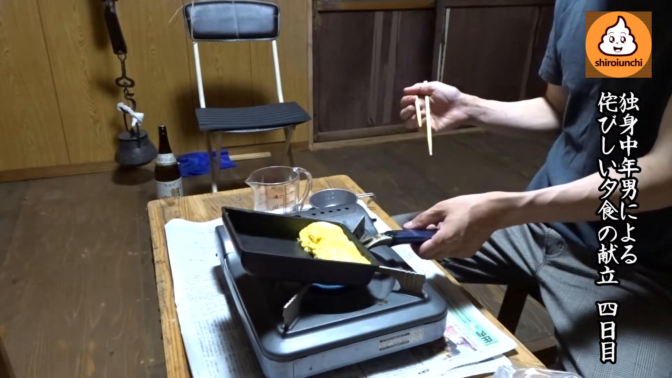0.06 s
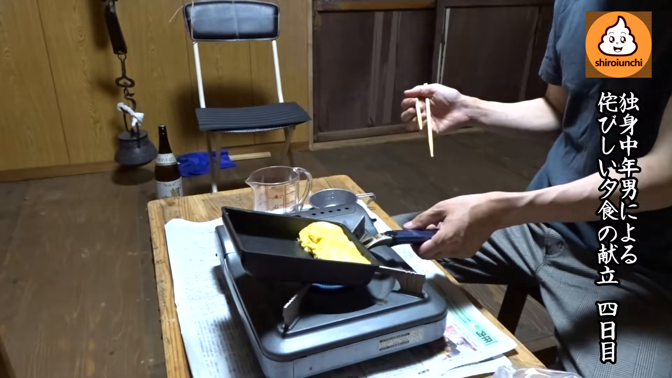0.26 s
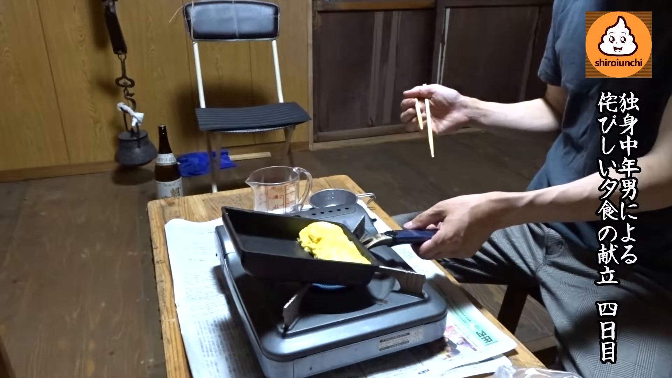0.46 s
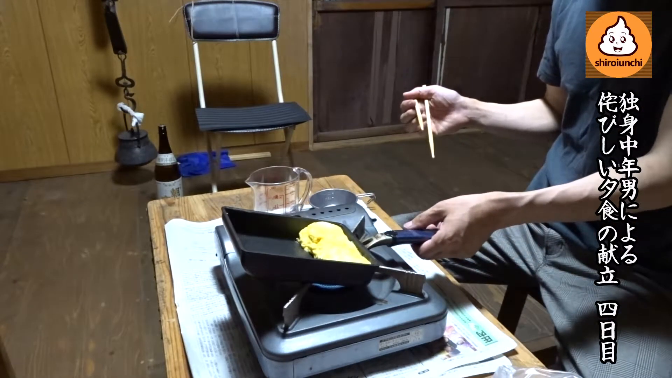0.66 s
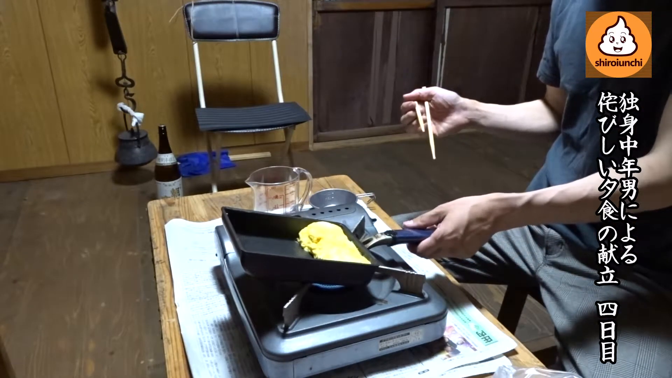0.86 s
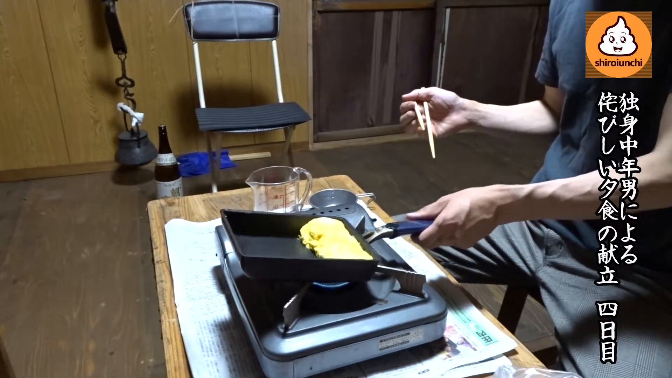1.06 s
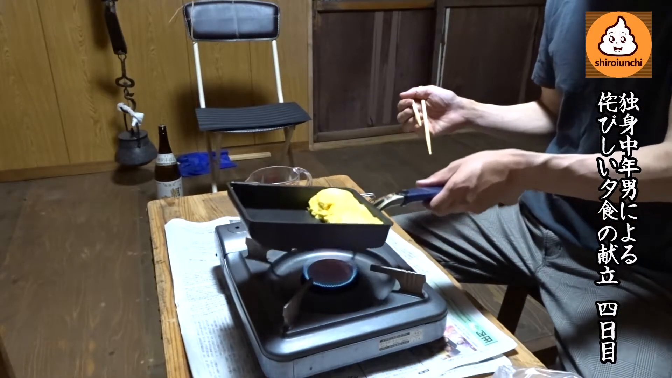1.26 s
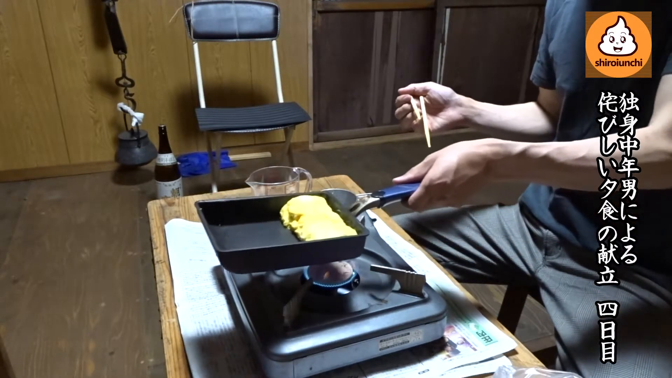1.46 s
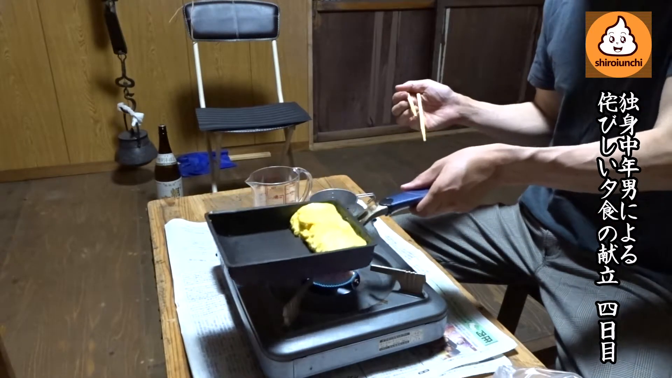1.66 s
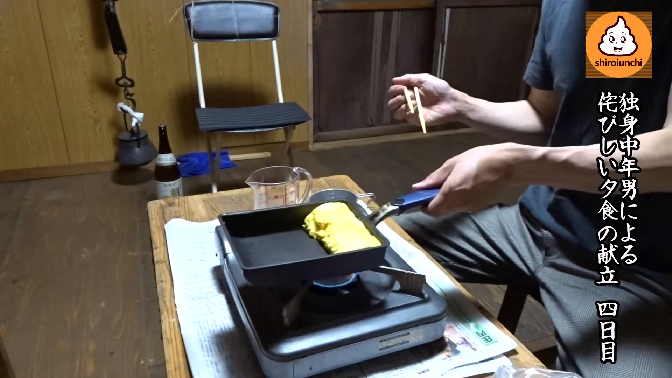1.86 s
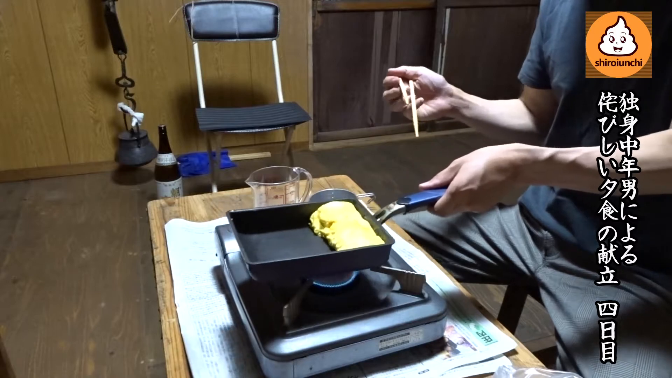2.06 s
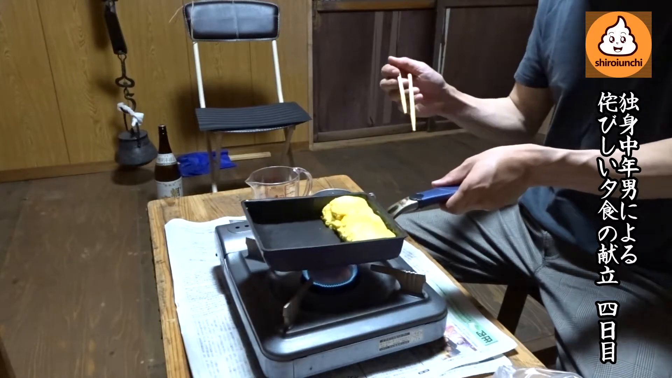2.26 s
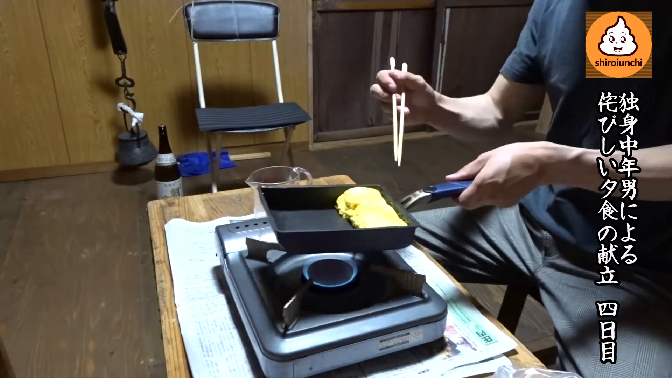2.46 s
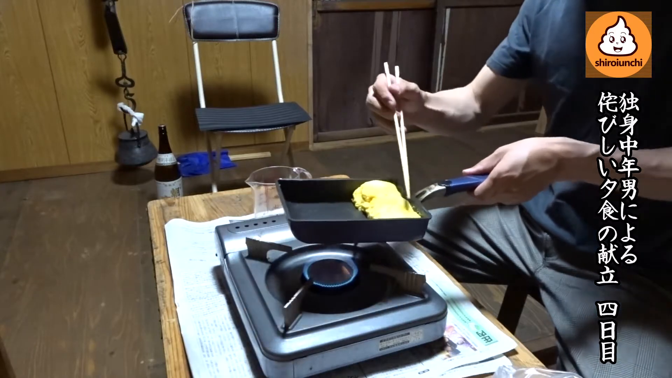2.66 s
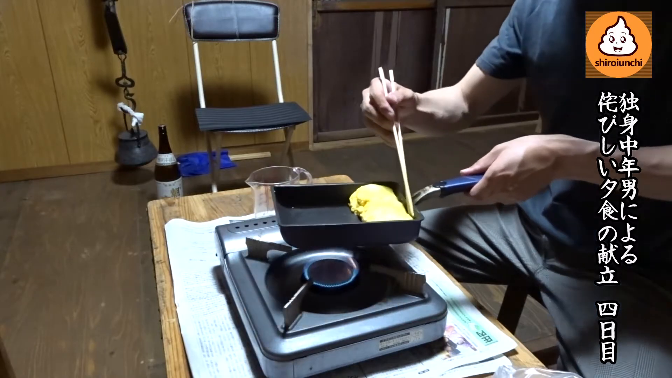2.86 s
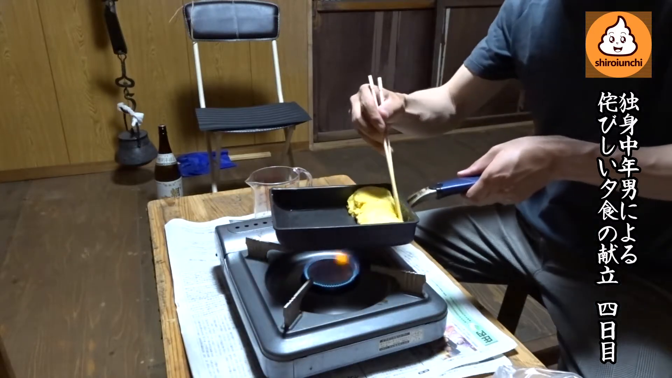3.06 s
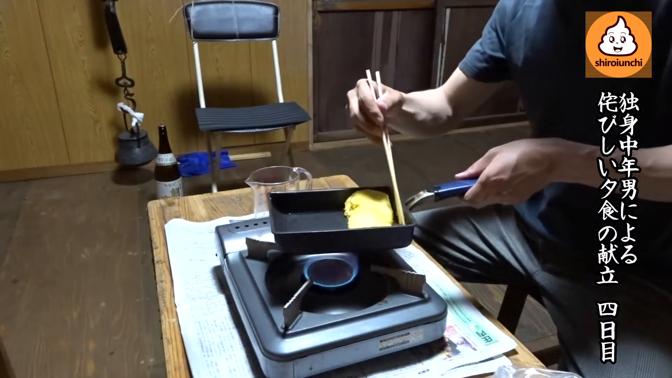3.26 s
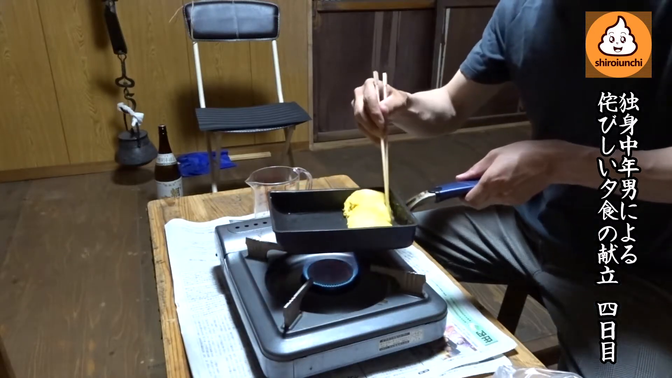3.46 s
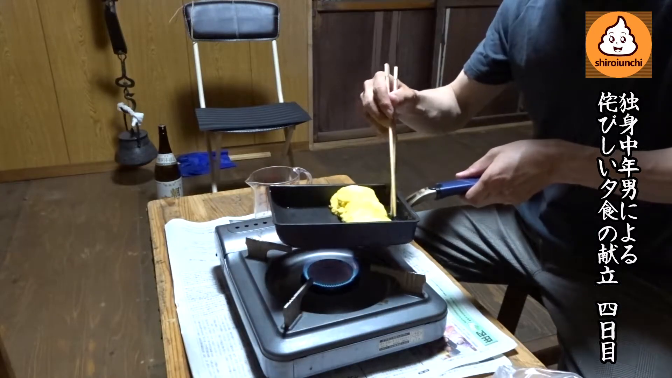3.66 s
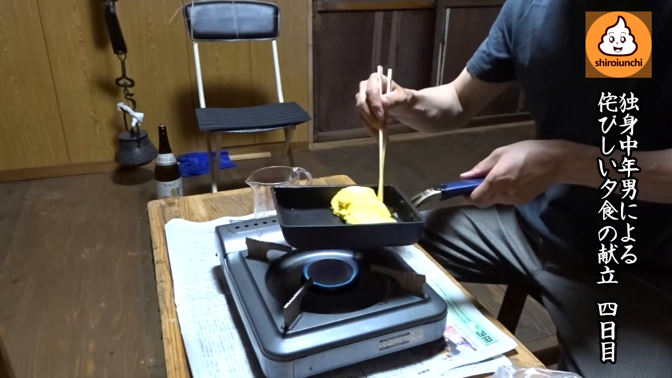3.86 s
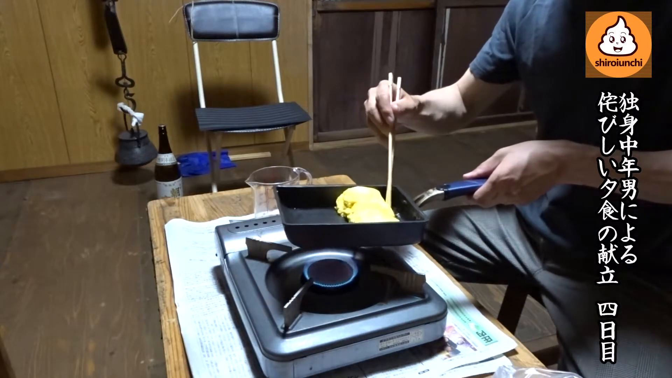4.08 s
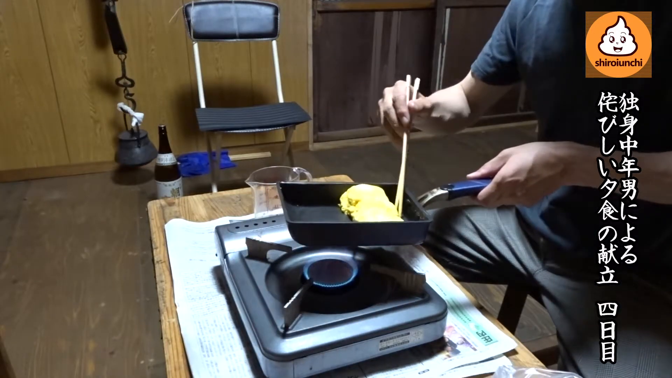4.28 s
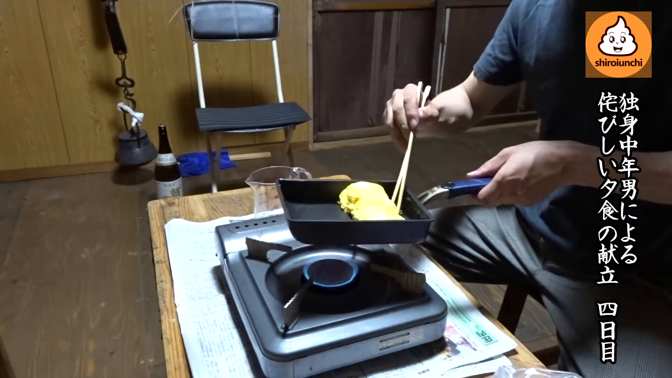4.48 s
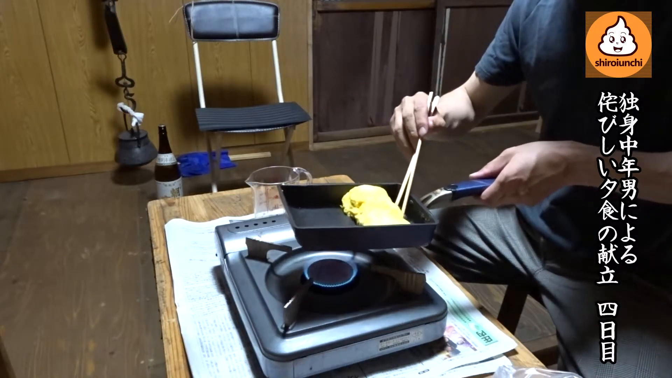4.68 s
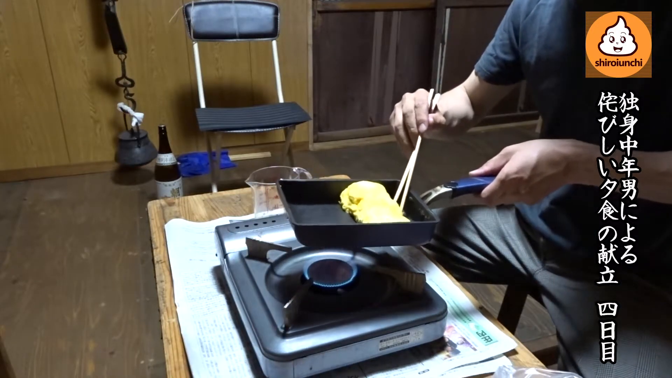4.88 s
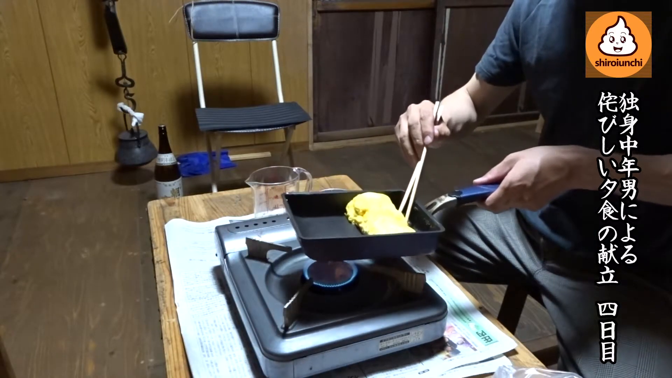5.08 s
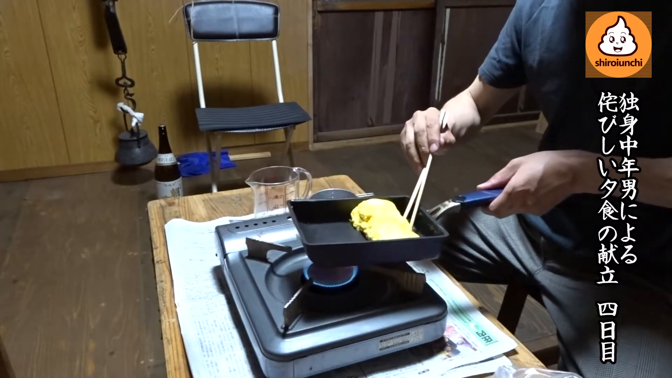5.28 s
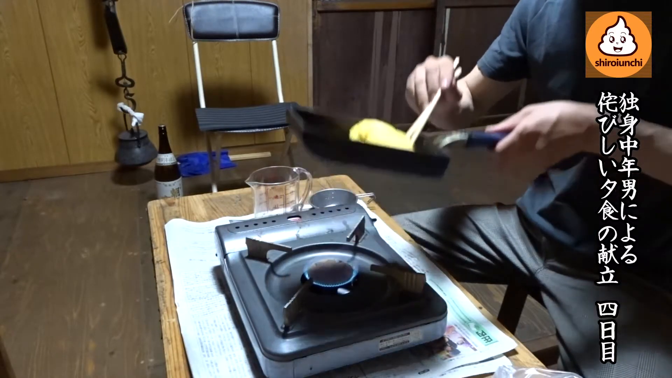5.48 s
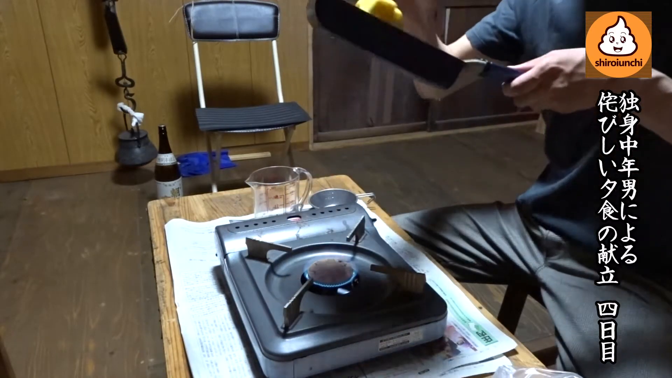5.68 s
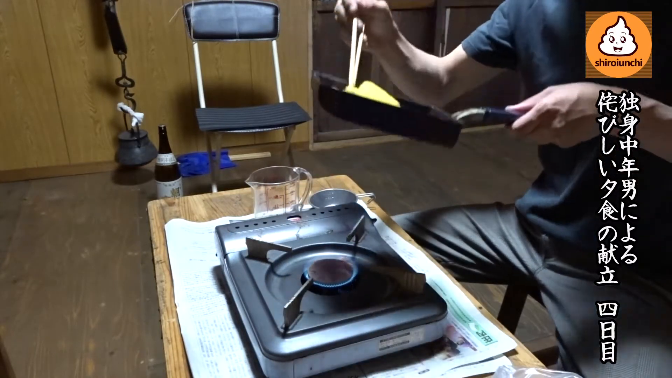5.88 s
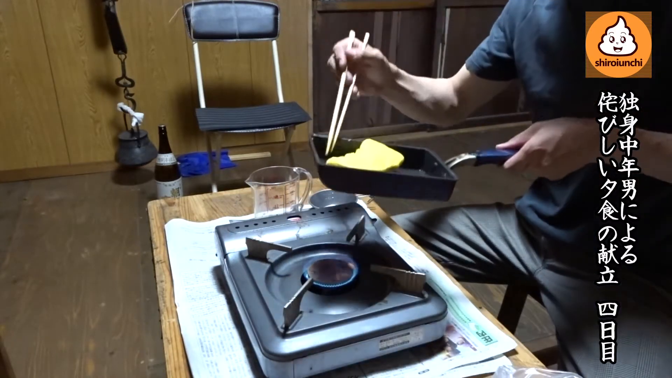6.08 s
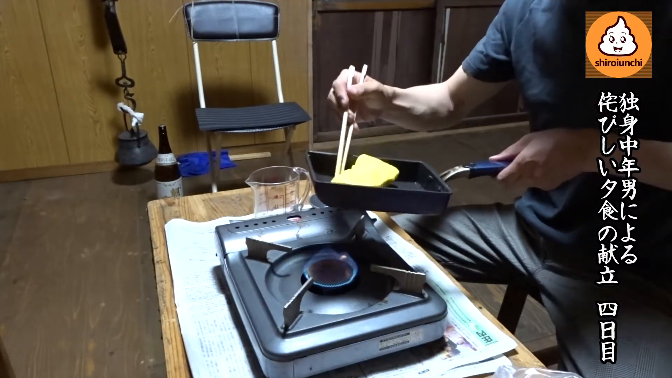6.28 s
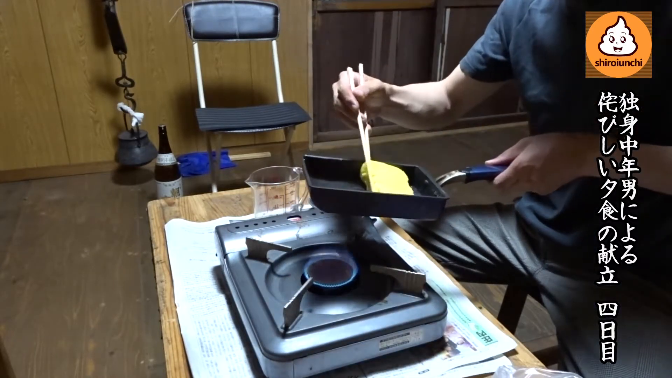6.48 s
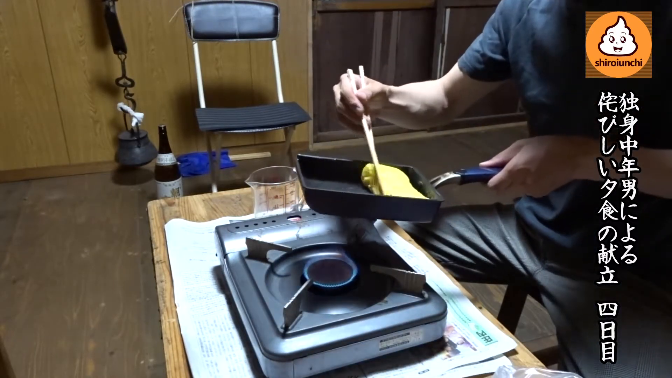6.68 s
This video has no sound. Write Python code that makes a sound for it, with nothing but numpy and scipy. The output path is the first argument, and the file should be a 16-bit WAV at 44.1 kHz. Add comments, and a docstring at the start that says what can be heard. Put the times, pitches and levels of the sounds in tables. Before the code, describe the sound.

Close stereo pickup in a small wooden room. An egg roll crackles in a square metal pan, with sharp oil spits over a faint low gas rush. At about one second the pan knocks and scrapes off the stove prongs with a hollow, groaning metallic boom. Frying surges unevenly and chopsticks tick lightly. Near the end the egg is flipped and its wet side erupts into loud, dense hissing that slowly fades.

```python
"""An egg roll sizzles in a square pan over a gas burner in a small wooden room: bursting steam bubbles.
Hot oil spits as short damped tones, and the burner rushes softly as coloured noise.
The pan is dragged off the stove's prongs: knocks and stick-slip friction excite sheet-metal modes.
Chopsticks tap as struck resonators; the egg is flipped, and its wet side bursts into a dense hiss."""
import sys
import numpy as np
from scipy import signal
from scipy.fft import rfft, irfft, next_fast_len
from scipy.io import wavfile

SR = 44100
rng = np.random.default_rng(int(sys.argv[2]) if len(sys.argv) > 2 else 0)


def pcm_store(signal):
    """Save signal as 16-bit PCM."""
    levels = np.round(np.clip(np.atleast_2d(signal), -1, 1) * 32767)
    wavfile.write(sys.argv[1], SR, levels.astype(np.int16).T)


N = 296793
TIME = np.arange(N) / SR  # [s]
FFT_SIZE = next_fast_len(N + 4096)
HZ = np.fft.rfftfreq(FFT_SIZE, 1 / SR)  # frequency grid of the filters

# spectrum of the first side: (frequency [Hz], level per hertz [dB])
FIRST_COLOUR = [(450, -7.5), (900, -5.5), (1200, -1.5), (1700, -2), (2200, -0.5), (2700, 0.5), (3900, -0.5),
                (5000, -3.5), (7200, -4), (8600, -2), (10000, -4), (11500, -8), (14900, -8.5), (15500, -41)]
# spectrum of the wet side: (frequency [Hz], level per hertz [dB])
WET_COLOUR = [(400, -25), (700, -21.5), (1000, -14), (1300, -12), (1800, -7), (2200, -2.5), (3200, -2),
              (4500, -3), (6200, -4), (8000, -6.5), (10000, -8.5), (12000, -10), (15700, -12.5)]
# bubble sizes on the wet side, large to tiny: (level [dB], fade as it dries [dB/s])
WET_SIZES = [(-47.5, 6), (-38, 8), (-34.5, 18.5)]
# bubble sizes on the first side, at mean vigour [dB]
SIMMER_DB, CRACKLE_DB, HISS_DB = -57, -48.5, -48.0
# the wet side lands, then hisses at full strength [s]
FLIP_S, FLIP_LENGTH_S, WET_HOLD_S = 5.73, 0.063, 0.72


def egg():
    """Superposed random bursts: the first side crackles sparsely, the wet side hisses densely, holds and fades."""
    mids_db, treble_db = vigour_swing()
    first_levels = [SIMMER_DB + mids_db, CRACKLE_DB + mids_db, HISS_DB + treble_db]
    first = sizzle(first_levels, FIRST_COLOUR, per_s=6000, spread_db=[2.4, 3.0, 3.2], ring_db=-2)
    drying_s = np.maximum(TIME - FLIP_S - WET_HOLD_S, 0)
    wet_levels = [db - fade * drying_s for db, fade in WET_SIZES]
    wet = sizzle(wet_levels, WET_COLOUR, per_s=14000, spread_db=[2.6, 3.0, 3.0], ring_db=4.5)
    wet_share = flipped()
    first_share = np.sqrt(1 - wet_share ** 2)  # the two powers add to one
    return first * first_share + wet * wet_share + puffs()


# frying on the first side, surging as the pan tilts and oil runs onto hot metal; only swings about the mean count:
# (time [s], level of the mids [dB], level of the treble [dB])
VIGOUR = [(0, -49, -47.5), (0.2, -52.5, -51), (0.95, -52.5, -51), (1.46, -50, -50), (1.52, -42, -44.5),
          (1.73, -49.5, -48), (1.78, -44, -42.5), (1.94, -44, -46), (2.09, -43, -47.5),
          (2.17, -46.5, -47.5), (2.24, -46.5, -46), (2.45, -50, -50.5), (3.06, -50, -50.5),
          (3.12, -47, -48), (3.38, -46.5, -48), (3.49, -43.5, -45), (3.6, -43.5, -43), (3.74, -47.5, -50),
          (3.85, -45, -47.0), (4.1, -47.5, -51), (4.65, -48.5, -51), (4.8, -49, -49.5), (5.38, -50, -50.5),
          (5.45, -46, -44.5), (5.6, -43.5, -42.5), (5.72, -44.5, -43.5)]


def vigour_swing():
    """Modulation about a mean: the vigour of the frying in dB, for mids and treble."""
    return [db - db[TIME < FLIP_S].mean() for db in in_time(VIGOUR)]


# the roll tips onto its edge just before it lands: length [s], share of the wet side that touches
TIP_LENGTH_S, TIP_SHARE = 0.51, 0.26


def flipped():
    """Growing contact area: an edge of the wet side touches as the roll tips, then all of it lands."""
    tipping = np.clip((TIME - FLIP_S) / TIP_LENGTH_S + 1, 0, 1)
    landing = np.clip((TIME - FLIP_S) / FLIP_LENGTH_S, 0, 1)
    return np.maximum(TIP_SHARE * tipping, landing)


# share of the sizzle's power that arrives directly: (frequency [Hz], share [0-1])
DIRECT = [(500, 0.62), (1200, 0.66), (2200, 0.95), (3300, 0.91), (5300, 0.24), (9000, 0.27), (15000, 0.13)]


def sizzle(levels_db, colour, per_s, spread_db, ring_db):
    """Bubble collapse in three sizes: large ones simmer, middle ones crackle, tiny ones hiss."""
    direct = at_hz(DIRECT, HZ)
    tone = from_db(at_hz(colour, HZ)) * through_pan(ring_db)
    edges = [350, 1600, 4500, SR]  # [Hz]
    out = 0
    for low, high, db, spread in zip(edges, edges[1:], levels_db, spread_db):
        bursts = grains(per_s, spread, clump_db=1.23)
        band = tone / np.sqrt((1 + (HZ / high) ** 12) * (1 + (low / (HZ + 1)) ** 12))
        heard = filtered(bursts, band * np.sqrt(direct))
        heard = heard + filtered(wash(bursts), band * np.sqrt(1 - direct))
        out = out + from_db(db) * rms_one(heard)
    return out


# modes of the pan: (frequency [Hz], width [Hz], level over the sizzle before ring_db [dB])
PAN = [(799.6, 8.1, 6), (1182, 8.2, 3), (1425, 26, -4.5), (1730, 35, -9.5), (2133, 24, 0.5),
       (2646, 20, -1.5), (3206, 20, -5.5), (4020, 22, -2)]


def through_pan(ring_db):
    """Modal resonance: the pan rings along with whatever bursts on it."""
    return 1 + sum(from_db(db + ring_db) * resonance(hz, width) for hz, width, db in PAN)


def wash(bursts, t60=0.28, near_share=0.17):
    """Diffuse reflection: noise follows the energy of bursts all over the pan, off the rim, then off the walls."""
    def fading(seconds):
        r = from_db(-120 / (seconds * SR))  # energy, so 60 dB doubles
        return signal.lfilter([1 - r], [1, -r], bursts ** 2 + 1e-18)
    energy = near_share * fading(0.0006) + (1 - near_share) * fading(t60)
    return np.sqrt(energy) * rng.standard_normal((2, N))


# steam squeezed from under the egg, through two equal resonances:
# (middle [s], length [s], frequency [Hz], width of each resonance [Hz], level at the middle [dB])
PUFFS = [(4.122, .14, 5561, 60, -55), (4.4, 3.6, 2600, 660, -53.5), (5.818, 0.062, 3650, 1404, -37),
         (5.955, .08, 3030, 260, -40), (6.09, 0.26, 3240, 260, -42), (6.213, 0.045, 1320, 280, -40),
         (6.27, 0.25, 3280, 260, -44), (6.33, 0.1, 1390, 200, -45.5)]


def puffs():
    """Turbulent jets through a resonance: pockets of steam under the egg sing as they vent."""
    out, turbulence = np.zeros(N), rng.standard_normal(N)
    for middle, length, hz, width, db in PUFFS:
        jet = rms_one(filtered(turbulence, resonance(hz, width) ** 2))
        swell = np.cos(np.pi * np.clip((TIME - middle) / length, -.5, .5))
        out += from_db(db) * jet * swell
    return out + from_db(-8.0) * room(out)


# the loudest spits of hot oil, before the room is added; the rows at 0.2777, 2.1087, 3.4092 and 3.7888 s are
# the sharp clicks of chopstick taps: # (time [s], peak level [dB], frequency [Hz], t60 [s], share of broad
# crack [0-1])
POPS = [(0.2777, -27, 3700, 0.009, .55), (0.2808, -27, 8800, 0.0077, .2), (0.4588, -24.5, 3700, 0.006, .5),
        (0.4732, -26, 8300, 0.005, .3), (0.5886, -27, 6300, 0.004, 0), (0.6403, -22, 3500, 0.009, .2),
        (1.4938, -17.5, 8000, 0.003, .7), (1.5964, -17.5, 9300, 0.008, .5), (1.6845, -28, 8500, .008, 0),
        (1.7665, -23, 8000, 0.0063, .3), (1.7815, -23.5, 6000, .003, .6), (1.8758, -16, 9300, 0.012, .45),
        (1.999, -26, 3200, 0.0095, 0), (2.1087, -22.5, 1950, 0.008, .5), (2.2236, -22, 6000, 0.004, .65),
        (2.3005, -26, 7000, .003, .5), (3.1025, -28, 3150, 0.008, .3), (3.4092, -26, 5200, 0.005, .65),
        (3.468, -27, 2500, 0.008, .2), (3.504, -25, 7000, .006, .5), (3.5839, -22, 3100, 0.0057, 0),
        (3.5896, -20, 6800, 0.012, 0), (3.5905, -19, 8800, 0.013, .1), (3.599, -20.5, 8000, 0.0065, 0),
        (3.6039, -18, 9200, 0.0083, .2), (3.7888, -24.5, 3100, 0.012, .2), (3.825, -29, 8000, .005, .3),
        (3.9503, -28.5, 4200, .004, .4), (3.964, -25.5, 2700, 0.006, .3), (4.0136, -26, 2900, 0.008, .3),
        (4.194, -23, 2850, 0.012, .1), (4.701, -29, 7000, .003, .4), (4.934, -25.5, 6100, 0.0083, .5),
        (4.9479, -24, 9500, 0.0055, .1), (5.1423, -27, 3000, 0.008, .2), (5.2122, -30, 9000, 0.006, 0),
        (5.324, -28, 8000, 0.003, .5), (5.3503, -27, 8400, 0.007, 0), (5.4368, -25.5, 3000, 0.007, .55),
        (5.6534, -22.5, 2600, 0.0064, .5)]
# spectrum of a spit's broad crack: (frequency [Hz], level per hertz [dB])
CRACK = [(2300, -10), (2800, 3), (4000, -10), (6000, -10), (9300, -2.5), (12000, -16), (16000, -14.5)]
SNAP_HZ = 3300  # pitch at which a pop's snap has weight snap_share; the weight grows as the square of pitch


def pops(snap_share=0.25, tone_share=0.9, rim_db=-10, room_db=-4):
    """Impulsive radiation: a sharp snap, a broad crack and damped ringing, scattered by the pan's rim and the room."""
    out, t = np.zeros(N), TIME[:1024]
    crack = coloured(signal.unit_impulse(N), CRACK)[:len(t)]
    for s, db, hz, t60, broad in [*POPS, *small_spits()]:
        snap = np.cos(2 * np.pi * hz * t) * from_db(-60 * t / .0005)
        partials = hz * np.exp(rng.normal(0, .04, (3, 1))) * [[.7], [1], [1.28]]
        tone = np.array([.25, .6, .25]) @ np.cos(2 * np.pi * partials * t) * from_db(-60 * t / t60)
        # a small source radiates little far from its own pitch
        band = [min(.42 * hz, 2200), min(1.8 * hz, 16000)]
        small = signal.butter(2, band, "band", fs=SR, output="sos")
        pop = signal.sosfilt(small, snap_share * (hz / SNAP_HZ) ** 2 * snap + tone_share * tone)
        pop = (1 - broad) * pop / np.abs(pop).max() + broad * crack / np.abs(crack).max()
        scatter = rng.standard_normal(len(t)) * from_db(-60 * t / .03)
        scatter = scatter / np.linalg.norm(scatter)
        pop = pop + from_db(rim_db) * signal.fftconvolve(pop, scatter)[:len(t)]
        at = round(s * SR)
        out[at:at + len(t)] += from_db(db) * pop / np.abs(pop).max()
    return out + from_db(room_db) * room(out)


# smaller spits at mean vigour: rate [1/s], peak level and its spread [dB], pitch range [Hz]
SPITS_PER_S, SPIT_DB, SPIT_SPREAD_DB, SPIT_LOW_HZ, SPIT_HIGH_HZ = 6, -33, 1, 2400, 8500
SPIT_CYCLES = 11  # a small spit dies by 60 dB within this many cycles


def small_spits(count=300):
    """Random process in the form of POPS, until the flip: spits come more often and louder in vigorous frying."""
    when, chance, size, pitch, broad = rng.random((count, 5)).T
    s = when * FLIP_S
    hz = SPIT_LOW_HZ * (SPIT_HIGH_HZ / SPIT_LOW_HZ) ** pitch
    swing = np.interp(s, TIME, vigour_swing()[0])
    peak_db = SPIT_DB + swing / 2 + SPIT_SPREAD_DB * (2 * size - 1)
    rows = np.transpose([s, peak_db, hz, SPIT_CYCLES / hz, broad / 2])
    return rows[chance < SPITS_PER_S * from_db(swing) * FLIP_S / count]


# pan knocking on the prongs: (time [s], relative level [dB])
KNOCKS = [(1.093, -17.5), (1.105, -25), (1.118, -25), (1.145, -34), (1.187, -21.5), (1.198, -17),
          (1.233, -21.5), (1.257, -27)]
# modes of the sheet-metal stove with the pan on it: (frequency [Hz], relative level [dB], t60 [s])
STOVE = [(167, -11, 0.18), (202, -7.5, 0.3), (234, -10, 0.3), (298.5, -4, 0.33), (338, -15, .36),
         (375, -7, 0.31), (428, -16, 0.47), (480.3, -4, 0.27), (517, -13, 0.2), (549, -5, 0.31),
         (612, -5.5, 0.25), (662, -11, 0.33), (748, -13, 0.4), (805.6, -3.5, 0.26), (956, -3.5, 0.24),
         (1117, -26, 0.32), (1154, -13.5, 0.48), (1344, -19, 0.3), (1440, -12, 0.46), (1505, -13, 0.28),
         (2250, -13, 0.18), (3320, -7, 0.077)]
# modes of the hollow table under the stove: (frequency [Hz], relative level [dB], t60 [s])
TABLE_BOOM = [(72.5, -10, 0.42), (85, -2, 0.4), (107.5, -7.5, 0.53)]
# judder, rasp and grit of the slide: (relative peak level [dB], rise [dB/s], fall [dB/s])
SLIDE = [(-32, 17, 99), (-32, 232, 200), (-37, 290, 114)]
PULL_PEAK_S = 1.179  # the pan is pulled harder until it slides free
SCUFF_S, SCUFF_DB = 0.016, -37  # a brief scuff leads into the first knock
# spectra of the sliding contact, each: (frequency [Hz], level per hertz [dB])
CLATTER = [(45, -56), (72, -1), (200, 3.5), (400, -5), (800, 2.5), (1400, -1.5), (2000, -19), (3000, -11),
           (5000, -44)]
RASP = [(1000, -10.5), (1800, -11.5), (2600, -8.5), (3300, -5), (3650, -11), (4100, -40), (6000, -38)]
GRIT = [(2500, 5), (4200, 10), (7200, 5), (10000, -1.5), (15000, -15)]
# the pan sings on the prongs as it slides, and once more as it grazes them:
# (start [s], hold until [s], frequency [Hz], level [dB], attack [s], t60 [s])
PRONG_SQUEALS = [(1.093, 1.225, 560, -28, 0.095, 0.3), (1.425, 1.475, 558, -54, .04, .25)]


def pan_drag(knock_db=-18, slip_db=-33.5, clatter_db=-4, tap_db=14, clack_db=-28, room_db=-9.0, rasp_room_db=-7):
    """Impact and friction: knocks and judder make stove and table boom, and the contact groans, squeals and rasps."""
    since, past_peak = TIME - KNOCKS[0][0], TIME - PULL_PEAK_S
    bearing = since > 0  # the weight bears on the prongs from the first knock on
    drag, rasp, grit = [from_db(db + np.minimum(rise * past_peak, -fall * past_peak)) * bearing
                        for db, rise, fall in SLIDE]
    rasp = rasp + from_db(clack_db - 60 * np.abs(since) / 0.065) * bearing  # the first contact chatters
    rasp = rasp + from_db(SCUFF_DB) * np.clip(since / SCUFF_S + 1, 0, 1) * (since <= 0)
    knocks = blows(KNOCKS)

    def slips():
        return grains(per_s=3000, spread_db=1.5, clump_db=1)

    force = from_db(knock_db) * knocks + from_db(slip_db) * drag * slips()
    # neighbouring modes start with opposite signs
    boom = sum(from_db(db) * (-1) ** k * ring(force, hz, t60) for k, (hz, db, t60) in enumerate(STOVE))
    table = sum(from_db(db + knock_db) * ring(knocks, hz, t60) for hz, db, t60 in TABLE_BOOM)
    clatter = from_db(clatter_db) * drag * rms_one(coloured(slips(), CLATTER))
    body = boom + clatter + from_db(tap_db) * coloured(knocks, CLATTER)
    body = body + groan() + sum(squeal(row, waver_share=0.0111, rough_db=1.0) for row in PRONG_SQUEALS)
    scrape = rasp * rms_one(coloured(slips(), RASP)) + grit * rms_one(coloured(slips(), GRIT))
    return body + table + scrape + room(from_db(room_db) * body + from_db(rasp_room_db) * scrape)


# the pan sticks and slips ever more slowly before it comes free: (time [s], slip rate [1/s], level [dB])
GROAN = [(1.11, 255, -70), (1.135, 255, -39), (1.17, 235, -39), (1.19, 212, -34), (1.205, 174, -38),
         (1.23, 146.5, -47), (1.28, 165, -84)]


def groan(rough_db=1.0, octave_db=-12):
    """Stick-slip oscillation: regular slips shake the stove with a low, falling tone."""
    hz, db = in_time(GROAN)
    phase = 2 * np.pi * np.cumsum(hz) / SR
    tone = np.sin(phase) + from_db(octave_db) * np.sin(2 * phase)
    return np.sqrt(2) * tone * from_db(db + rough_db * drift(90)) * (TIME > GROAN[0][0])


def squeal(row, waver_share, rough_db):
    """Friction-driven mode: it swells, wavers in pitch and level, then rings out once the rubbing stops."""
    start, end, hz, db, attack, t60 = row
    phase = 2 * np.pi * np.cumsum(hz * (1 + waver_share * drift(80))) / SR
    level_db = db + rough_db * drift(60) - 60 * np.maximum(TIME - end, 0) / t60
    swell = np.clip((TIME - start) / attack, 0, 1)
    return np.sqrt(2) * np.sin(phase) * from_db(level_db) * swell


# chopsticks clicking together and against the pan: (time [s], relative level [dB])
TAPS = [(.2745, -35), (1.0615, -30), (2.798, -37), (2.863, -22), (3.4105, -21), (3.789, -40)]
# modes of a chopstick: (frequency [Hz], relative level [dB], t60 [s])
CHOPSTICK = [(2180, -19.5, 0.08), (2600, -19, 0.025), (3180, -17.5, 0.046), (3540, -13, .015),
             (4830, -20, 0.02), (8000, -21, .008)]
# chopsticks rub the pan during and after the flip:
# (start [s], hold until [s], frequency [Hz], level [dB], attack [s], t60 [s])
STICK_SQUEAKS = [(5.68, 5.94, 1171, -50, 0.2, 0.15), (6.18, 6.25, 1176, -54, .03, 1.0)]


def chopsticks(room_db=-6):
    """Struck bars: light taps set the wooden sticks ringing briefly; friction makes their tips squeak on the pan."""
    taps = blows(TAPS)
    out = sum(from_db(db) * (-1) ** k * ring(taps, hz, t60) for k, (hz, db, t60) in enumerate(CHOPSTICK))
    out = out + sum(squeal(row, waver_share=0.00575, rough_db=0.0) for row in STICK_SQUEAKS)
    return out + from_db(room_db) * room(out)


# spectrum of the burner: (frequency [Hz], level per hertz [dB])
FLAME = [(15, -57), (25, -13), (81, -6.5), (170, -3.5), (259, -3.5), (292, 0), (320, -2.5), (377, -0.5),
         (517, -4.5), (565, -7.5), (730, -6.5), (900, -40), (1170, -29), (1980, -120)]
FLAME_DB = -61  # at mean vigour
FLAME_FOLLOWS = 0.19  # the tilting pan that stirs the oil also spreads the flame: share of the vigour's swing


def flame(side_db=-7.0, flutter_db=1.0):
    """Combustion noise: a soft turbulent rush, swelling where the pan meets the flame."""
    mid, side = coloured(rng.standard_normal((2, N)), FLAME)
    side = filtered(side, HZ / (HZ + 70))  # long waves reach both ears alike
    swell_db = FLAME_FOLLOWS * vigour_swing()[0] * (1 - flipped())
    level_db = FLAME_DB + swell_db + flutter_db * drift(9.1)
    return from_db(level_db) * rms_one(mid + from_db(side_db) * side * [[1], [-1]])


# reverberation of the room: (frequency [Hz], t60 [s])
ROOM_T60 = [(100, 0.28), (1000, 0.3), (4000, 0.4), (15000, 0.29)]


def room(x):
    """Diffuse reverberation at unit power gain: alike at both ears in the bass, each band with its own decay."""
    size = SR // 2
    t, hz = TIME[:size], np.fft.rfftfreq(size, 1 / SR)
    mid, side = rfft(rng.standard_normal((2, size)))
    apart = np.minimum(hz / 1500, 1)
    noise = (mid + apart * side * [[1], [-1]]) / np.sqrt(1 + apart ** 2)
    edges, response = [0, 300, 1000, 2500, 5000, 10000, SR], 0
    for low, high in zip(edges, edges[1:]):
        decay = from_db(-60 * t / at_hz(ROOM_T60, (low + high) / 2))
        fade = decay * np.clip((t - .002) / .004, 0, 1)  # reflections set in after 2 ms
        band = irfft(noise * ((hz >= low) & (hz < high)), size)
        response = response + band * fade / np.sqrt(np.sum(fade ** 2))
    return signal.fftconvolve(x[None], response, axes=1)[:, :N]


def ring(force, hz, t60):
    """Damped oscillator: a unit click sets a decaying sine of starting height 1 ringing."""
    r, w = from_db(-60 / (t60 * SR)), 2 * np.pi * hz / SR
    return signal.lfilter([0, np.sin(w)], [1, -2 * r * np.cos(w), r * r], force + 1e-18)


def resonance(hz, width):
    """Frequency response of one damped mode, 1 at its top."""
    return 1 / (1 + 2j * (HZ - hz) / width)


def blows(rows):
    """Impulsive force: one click for each row of (time [s], level [dB])."""
    force = np.zeros(N)
    for s, db in rows:
        force[round(s * SR)] += from_db(db)
    return force


def grains(per_s, spread_db, clump_db):
    """Random impulse process of rms 1: clicks whose level drifts in clumps, many small, a few large."""
    born = rng.random(N) < per_s / SR
    size_db = spread_db * np.minimum(rng.exponential(1, N), 6) + clump_db * drift(70)
    return rms_one(born * from_db(size_db) * rng.choice([-1, 1], N))


def drift(per_s):
    """Slow random modulation of rms 1: straight lines between random knots."""
    knots = rng.standard_normal(2048)
    return rms_one(np.interp(TIME * per_s, np.arange(len(knots)), knots))


def coloured(x, spectrum):
    """Minimum-phase filter, so nothing sounds early; the spectrum falls away below its first point."""
    gain = from_db(at_hz(spectrum, HZ)) * np.clip(HZ / spectrum[0][0], .03, 1) ** 2
    cepstrum = irfft(np.log(gain), FFT_SIZE)[:FFT_SIZE // 2]
    return filtered(x, np.exp(rfft(2 * cepstrum, FFT_SIZE) - cepstrum[0]))


def filtered(x, gain):
    """Linear filtering: a gain for every frequency in HZ."""
    return irfft(rfft(x, FFT_SIZE) * gain, FFT_SIZE)[..., :N]


def at_hz(points, hz):
    """Interpolation of a table on a log-frequency axis."""
    f, value = np.transpose(points)
    return np.interp(np.log(np.maximum(hz, 1)), np.log(f), value)


def in_time(rows):
    """Linear interpolation of each column of a curve, sample by sample."""
    s, *columns = np.transpose(rows)
    return [np.interp(TIME, s, c) for c in columns]


def rms_one(x):
    """Power normalisation: the mean of the channels gets rms 1."""
    return x / np.sqrt(np.mean(np.atleast_2d(x).mean(axis=0) ** 2) + 1e-20)


def from_db(db):
    """Logarithmic level: decibels to amplitude gain."""
    return 10 ** (np.asarray(db) / 20)


def scene():
    """Superposition, with level differences between the ears: egg, spits and chopsticks lean slightly right."""
    lean_db = 0.5
    in_pan = (egg() + pops() + chopsticks()) * from_db([[-lean_db], [lean_db]])
    return in_pan + pan_drag() + flame()


CUTOFF_HZ = 15850


def record(dry):
    """Band limiting: a steep elliptic low-pass cuts the top."""
    return signal.sosfilt(signal.ellip(12, .1, 80, CUTOFF_HZ, fs=SR, output="sos"), dry)


dry = scene()
out = record(dry)
pcm_store(out)
```